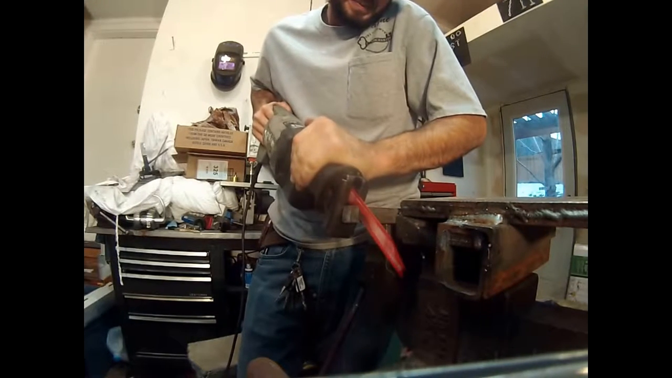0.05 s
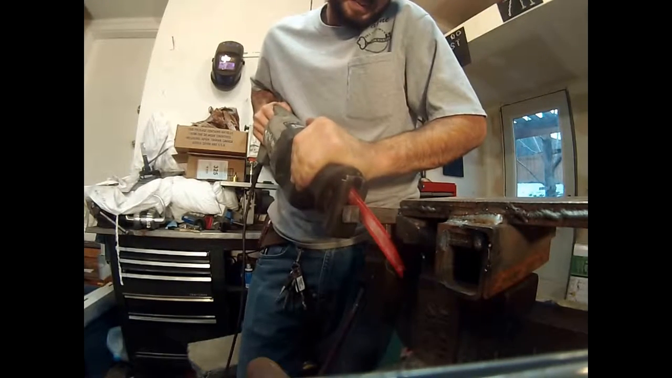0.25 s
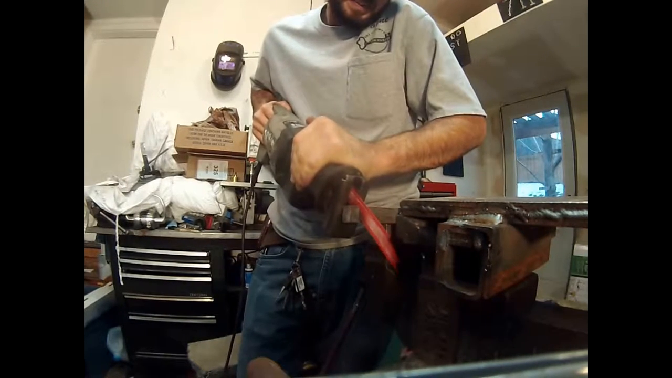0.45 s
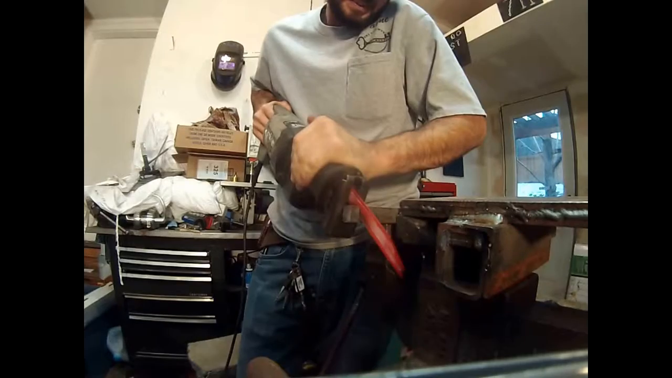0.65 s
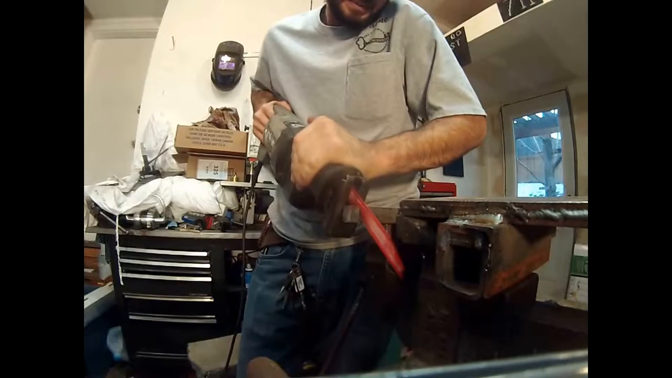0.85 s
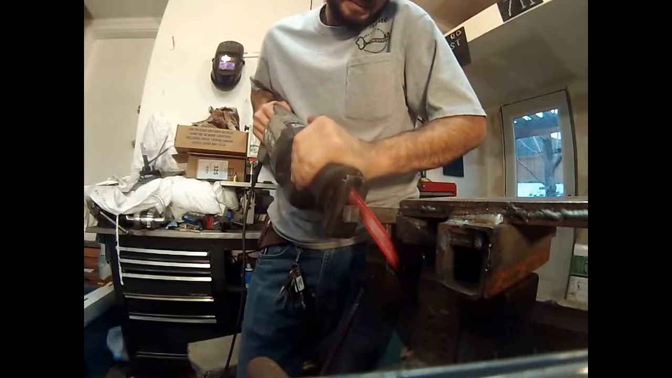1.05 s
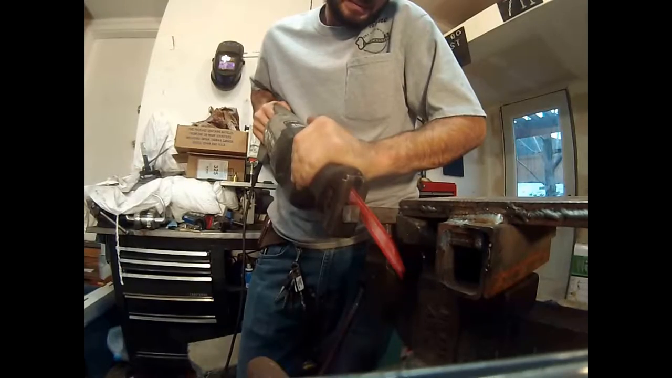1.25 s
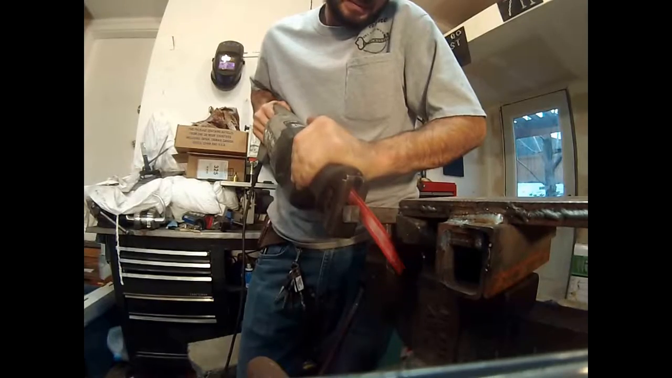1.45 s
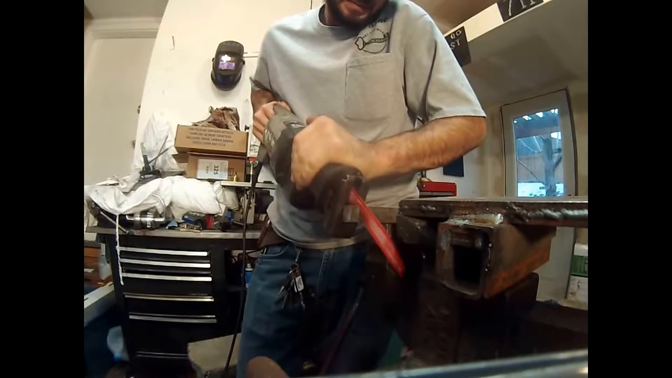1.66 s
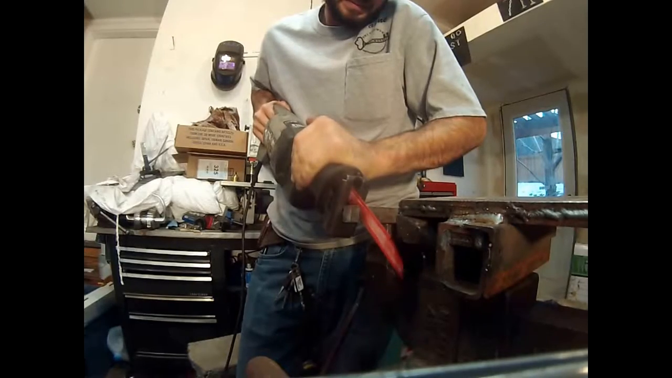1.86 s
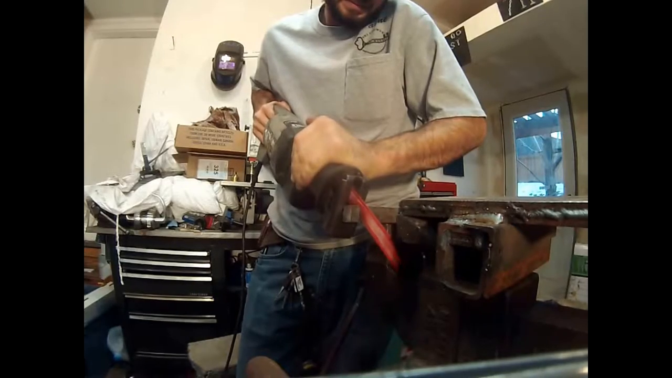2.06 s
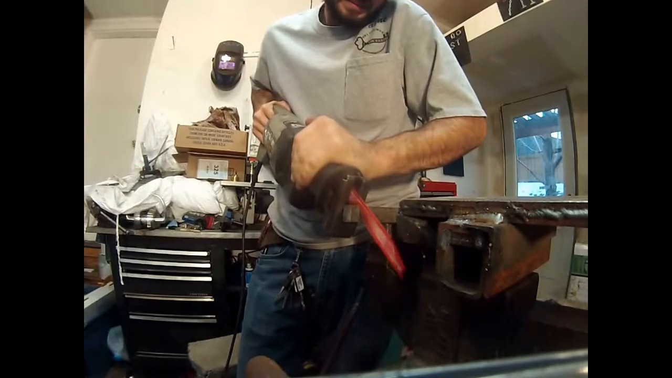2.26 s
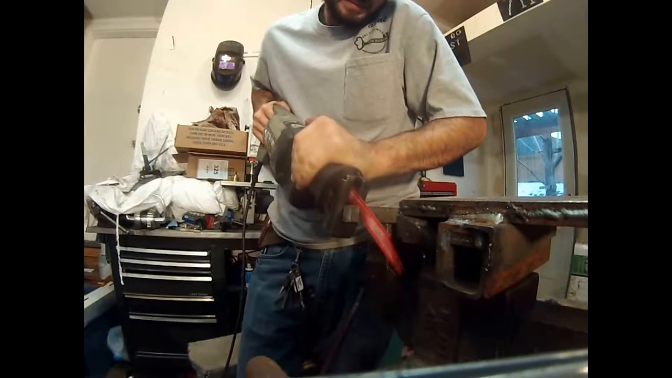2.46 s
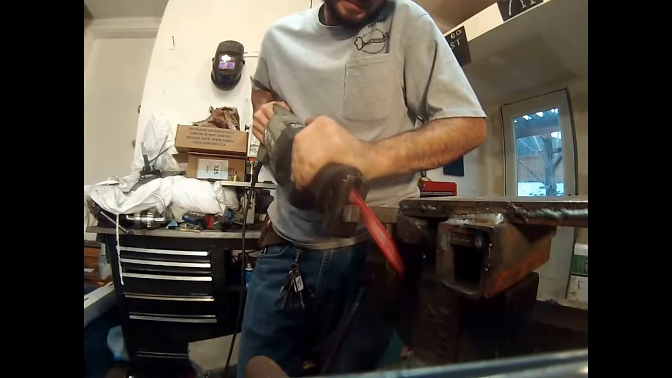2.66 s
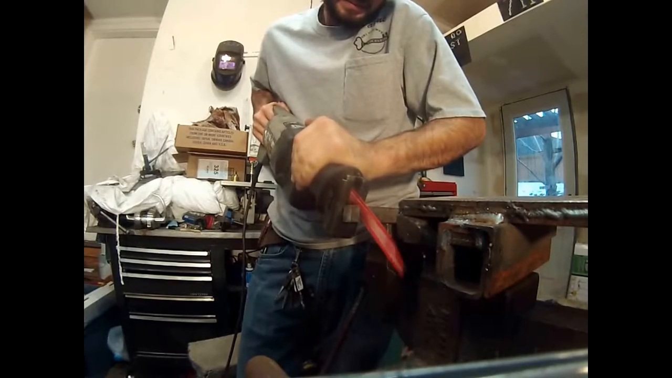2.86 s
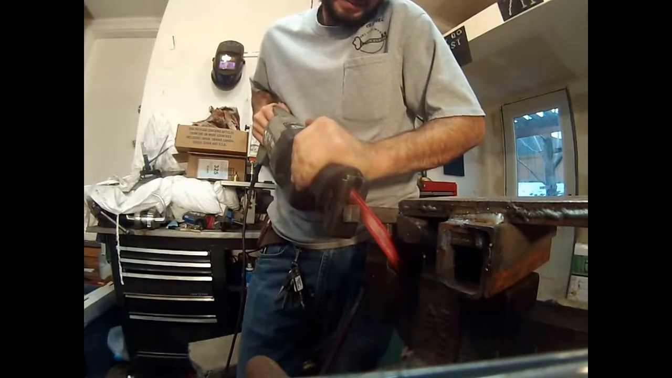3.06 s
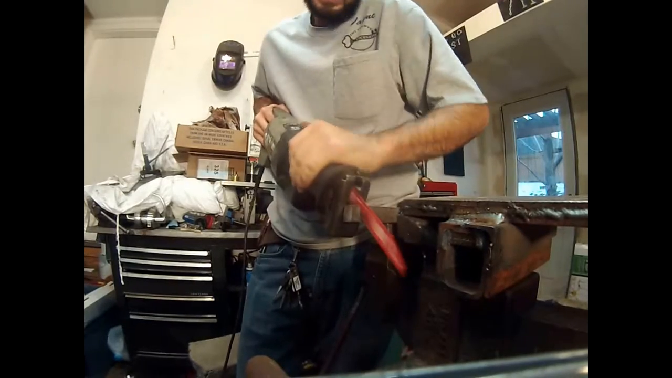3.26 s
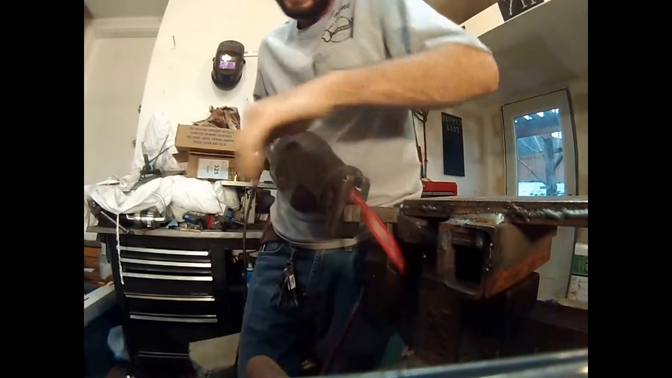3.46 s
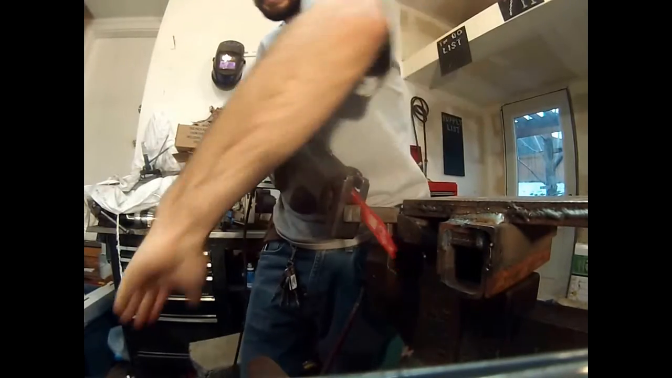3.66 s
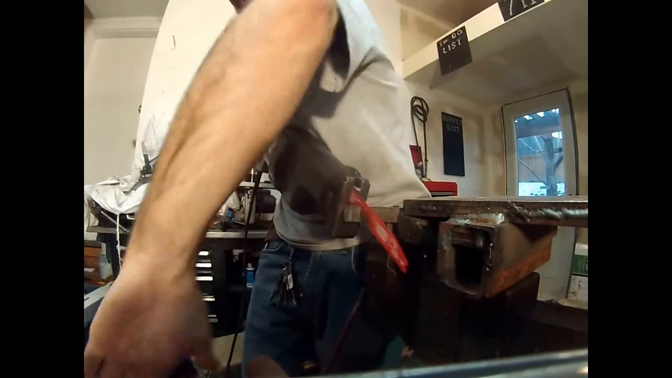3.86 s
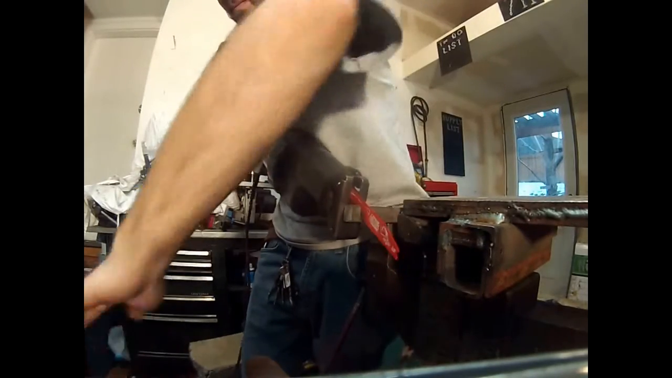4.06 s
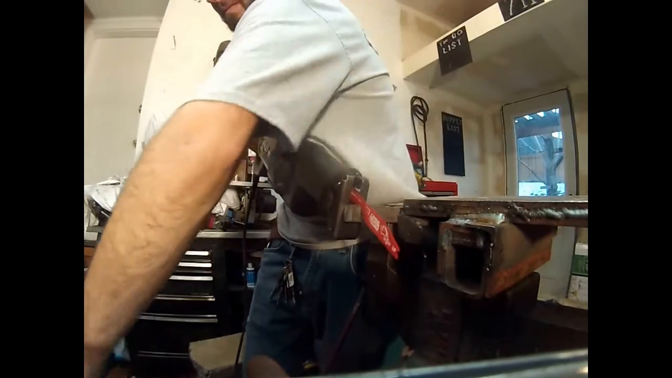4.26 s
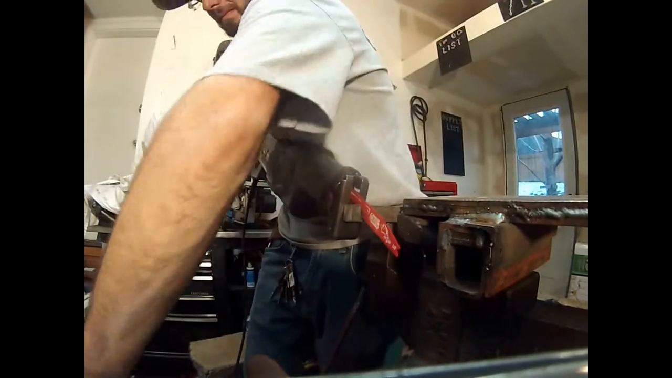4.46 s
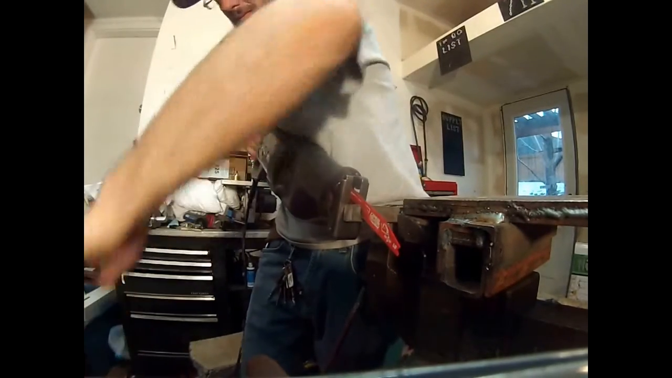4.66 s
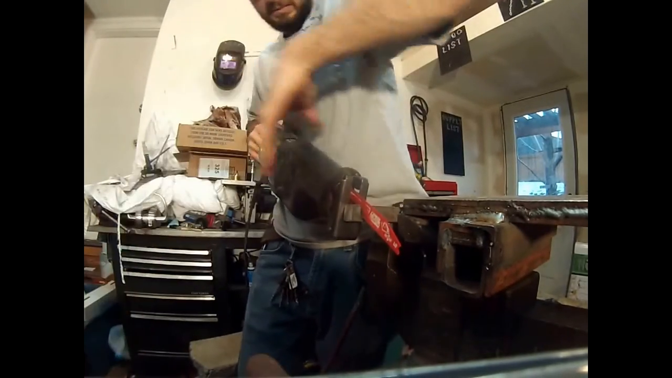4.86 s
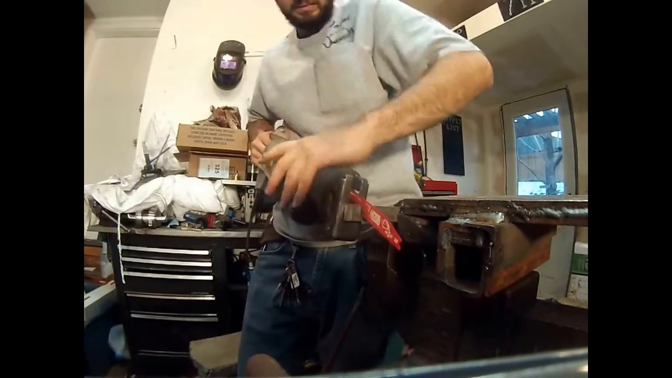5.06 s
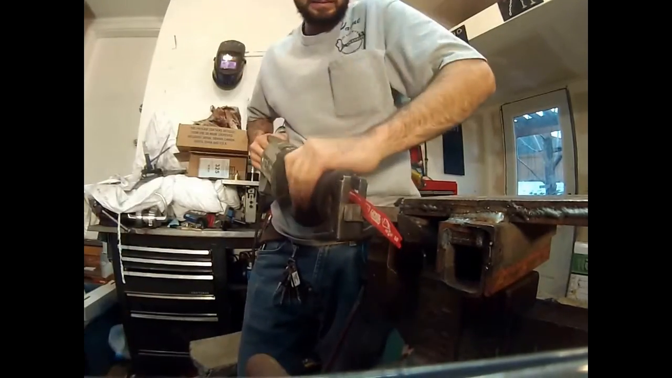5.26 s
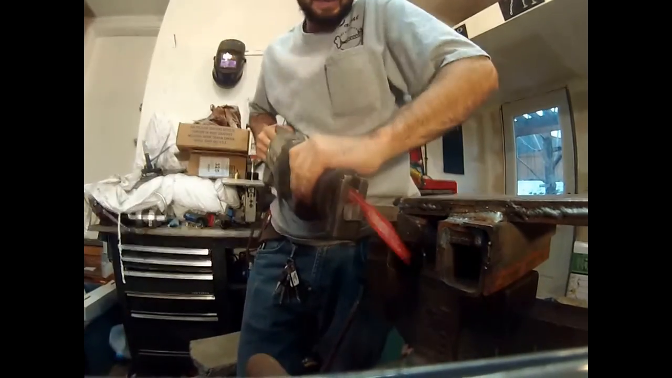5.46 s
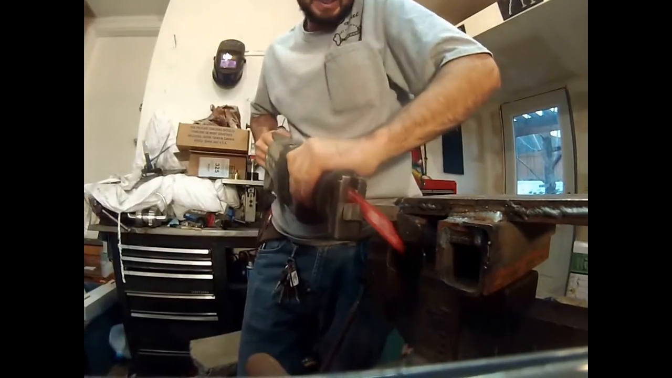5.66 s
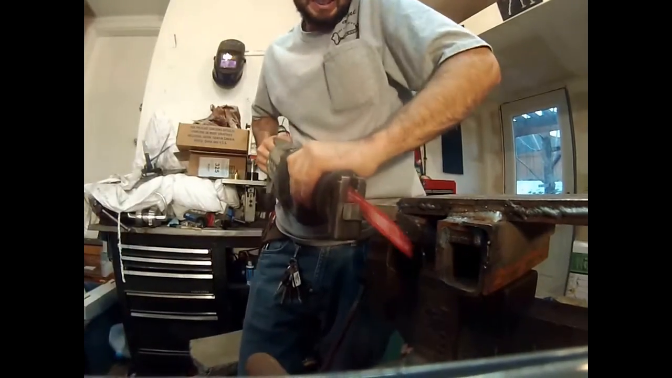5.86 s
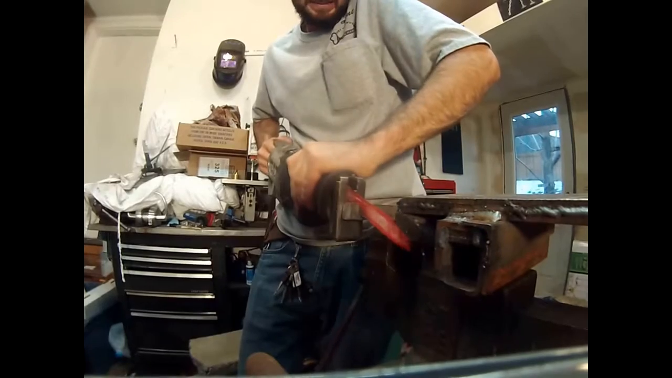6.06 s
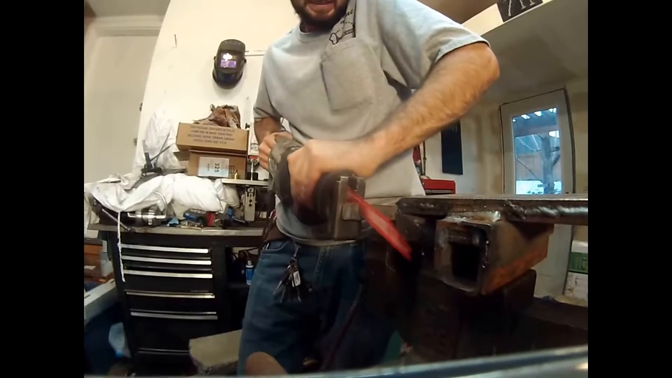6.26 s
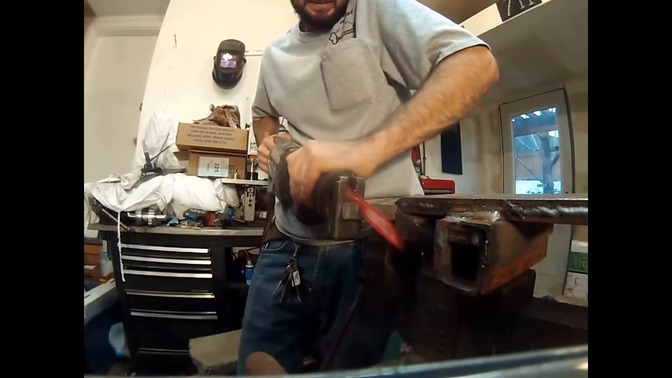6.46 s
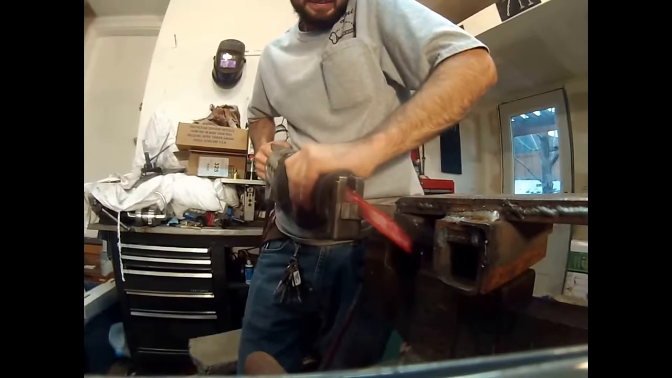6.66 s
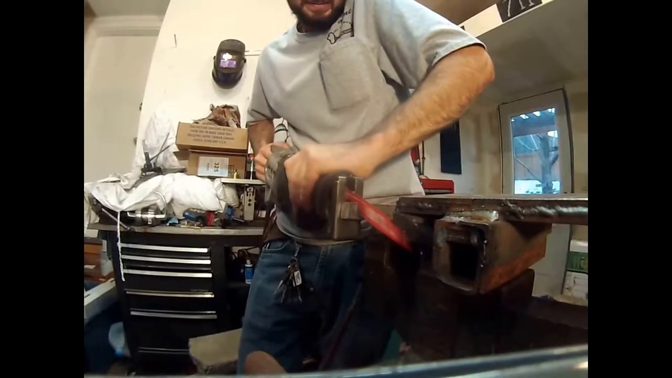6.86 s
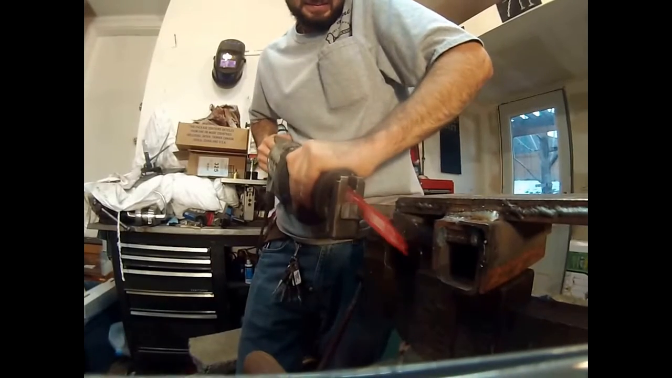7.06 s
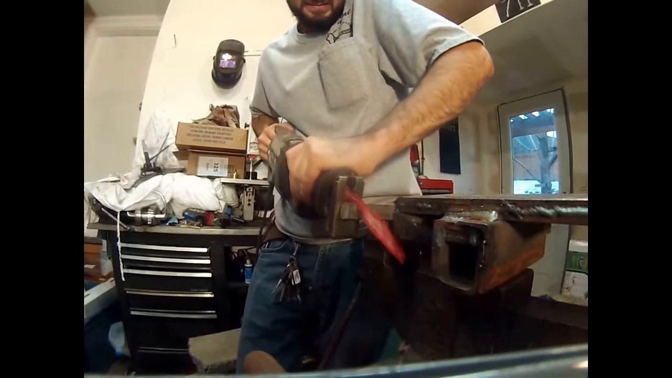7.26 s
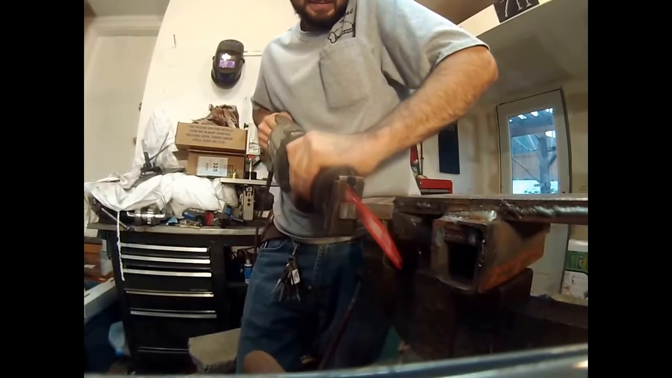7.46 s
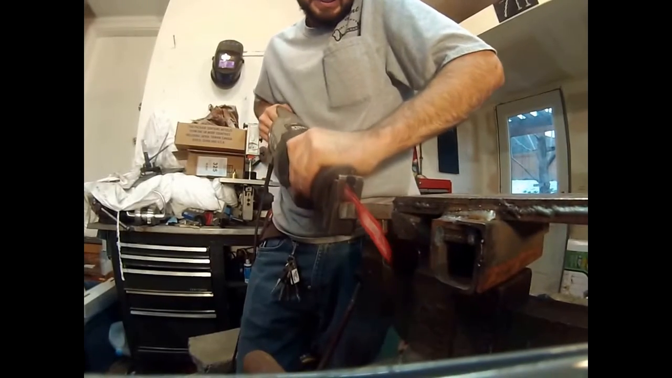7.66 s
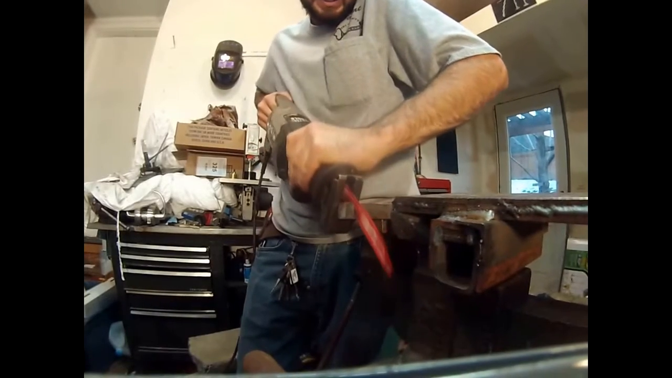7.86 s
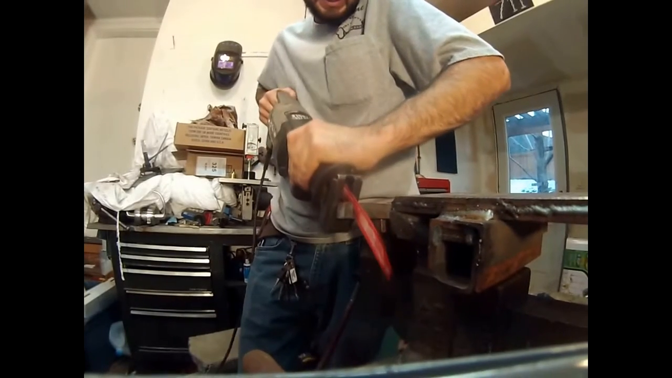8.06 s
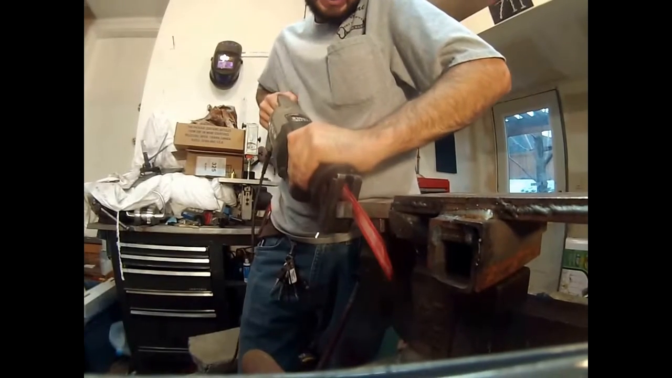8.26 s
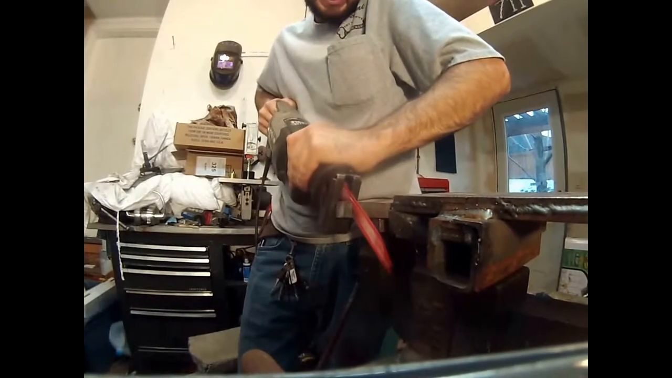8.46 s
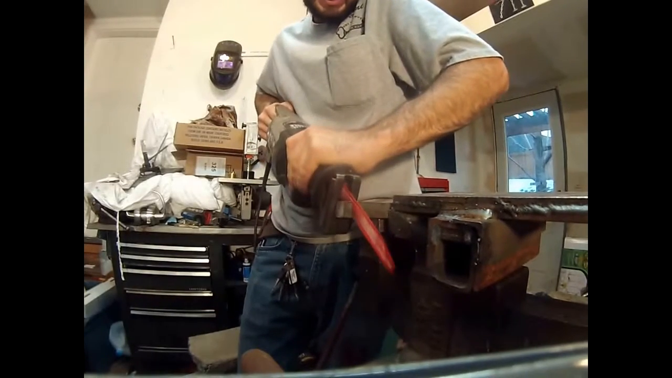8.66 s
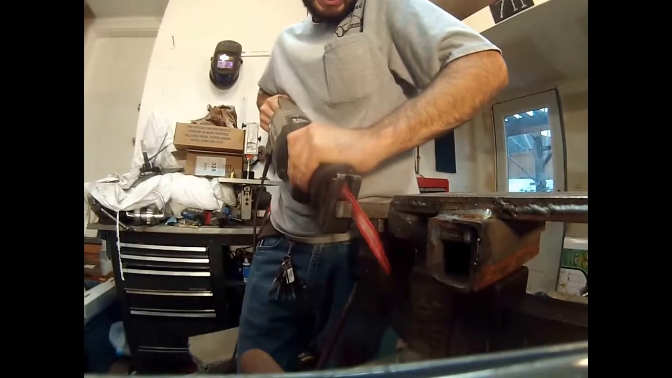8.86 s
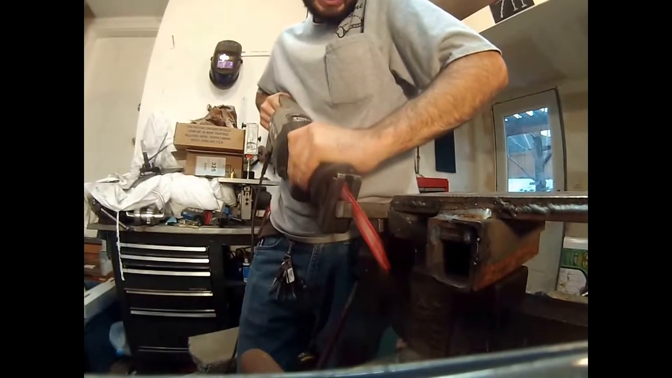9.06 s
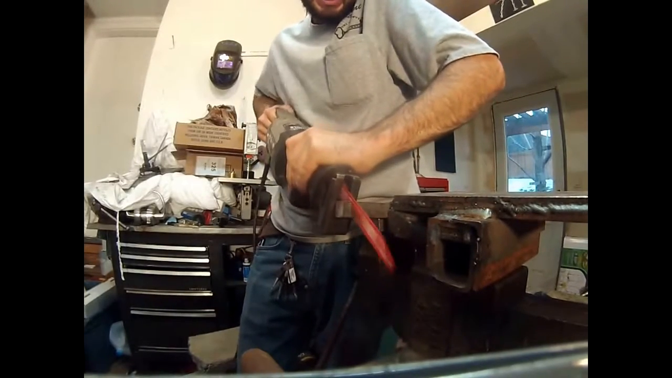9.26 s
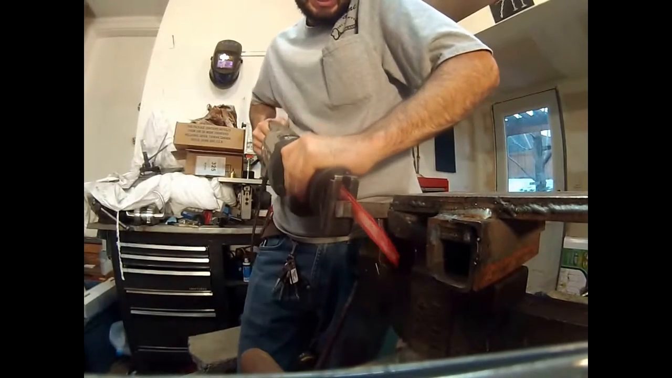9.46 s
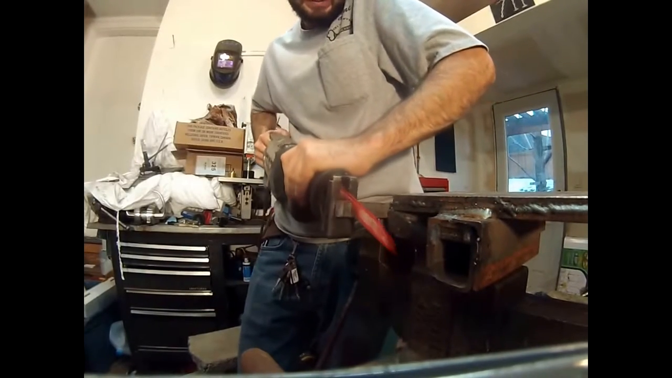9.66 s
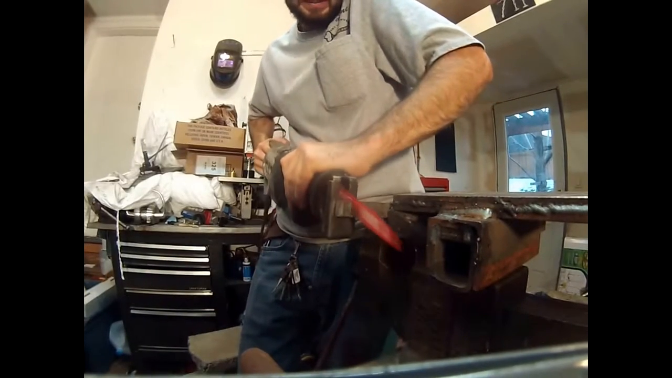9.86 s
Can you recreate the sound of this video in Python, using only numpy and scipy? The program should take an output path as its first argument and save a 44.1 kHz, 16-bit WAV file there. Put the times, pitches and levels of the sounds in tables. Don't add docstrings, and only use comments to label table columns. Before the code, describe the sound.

From 0 to about 3.1 s a corded reciprocating saw cuts a steel tube steadily, close up: some thirty-three clacks a second merge into a harsh buzzing rattle, with gritty tooth rasp, ringing metal, high gear whine and low bench thump. At 3.2 s power is released; the whine falls and the strokes separate into slowing, heavy knocks, halting around 4.0 s. A small scrape and quickly damped clink follow, then a rougher steel drag from 4.35 to 4.8 s with a bright clink ringing at 4.6 s, and faint ticks in near quiet. At 5.34 s the trigger snaps, the motor surges with a few jolting knocks, and cutting resumes. This second cut is more uneven, with hard knocks, hammering chatter and singing metal; it labours and binds around 7.7-8.4 s, recovers speed, and continues to about 9.9 s. Short room reflections surround it.

```python
import sys
import numpy as np
from scipy import signal
from scipy.io import wavfile
from scipy.ndimage import uniform_filter1d, map_coordinates

SR = 44100
rng = np.random.default_rng(int(sys.argv[2]) if len(sys.argv) > 2 else 0)


def persist_wave(psi):
    counts = np.round(np.clip(psi, -1, 1) * 32767).astype(np.int16)
    wavfile.write(sys.argv[1], SR, np.atleast_2d(counts).T)


def elevation(decibels):
    levels = np.asarray(decibels, float)
    return 10 ** (levels / 20)


N = 436590
TIME = np.arange(N) / SR
STOP_S, START_S, BITE_S = 4.04, 5.335, 5.378
FULL_SPEED = 33.3


def evened(x):
    return x / np.sqrt(np.mean(x ** 2) + 1e-20)


def read(points, hz):
    f, value = np.transpose(points)
    return np.interp(np.log(hz + 1), np.log(f + 1), value)


def curves(tables):
    s, *columns = np.transpose(np.concatenate(tables))
    on = sum((TIME >= rows[0][0]) & (TIME <= rows[-1][0]) for rows in tables)
    return [np.interp(TIME, s, c) for c in columns] + [uniform_filter1d(on * 1., size=200)]


def colour(x, points):
    hz = abs(np.fft.fftfreq(8192, 1 / SR))
    gain = np.log(elevation(np.maximum(read(points, hz), -90)))
    taps = np.fft.ifft(np.exp(gain - 1j * signal.hilbert(gain).imag)).real[:4096]
    return signal.oaconvolve(x, taps)[:len(x)]


def ring(x, modes):
    out = np.zeros(len(x))
    for hz, width, db in modes:
        r = np.exp(-np.pi * width / SR)
        poles = [1, -2 * r * np.cos(2 * np.pi * hz / SR), r * r]
        out += elevation(db) * (1 - r * r) / 2 * signal.lfilter([1, 0, -1], poles, x)
    return out


def twice(x, modes):
    out = 0
    for hz, width, db in modes:
        mode = [(hz, width, 0)]
        out = out + elevation(db) * ring(ring(x, mode), mode)
    return out


def drift(rate):
    coarse = np.arange(0, N + 16, 16)
    points = rng.standard_normal(round(N * rate / SR) + 3)
    smooth = map_coordinates(points, [coarse * rate / SR], order=3)
    return np.interp(np.arange(N), coarse, evened(smooth))


def add(mix, s, sound):
    part = mix[round(s * SR):][:len(sound)]
    part += sound[:len(part)]


def typed(events):
    s, db = np.transpose(events)
    clicks = np.zeros(N)
    clicks[(s * SR).astype(int)] = elevation(db)
    return clicks


def bursts(clicks, rise, fall):
    t = np.arange(900) / SR
    shape = 1 / (np.exp((4 * rise - t) / rise) + np.exp((t - 4 * rise) / fall))
    return signal.oaconvolve(clicks, shape)[round(4 * rise * SR):][:N] * rng.standard_normal(N)


def bump(turns, at, depth):
    return np.exp(depth * np.cos(2 * np.pi * (turns - at)))


def spells(rows, edge=0.019):
    out = 0
    for s, length, db in rows:
        inside = np.minimum(TIME - s, s + length - TIME)
        out = out + db * np.clip(inside / edge + .5, 0, 1)
    return out


# start_s, speed_strokes_per_s
SPEED = [
    [(0, 33.661), (.8, 33.55), (1.15, 32.85), (2.3, 33.0), (3.11, 33.3)],
    [(5.335, 12), (5.405, 26), (5.425, 17.8), (5.5, 22.905), (5.7, 31.825), (6.1, 31.849), (6.4, 33.231),
     (6.8, 32.965), (7.4, 32.365), (8.15, 29.71), (8.5, 32.926), (8.9, 33.657), (9.9, 33.488)],
]


def speed():
    off, top = SPEED[0][-1]
    coasting = (TIME > off) & (TIME < SPEED[1][0][0])
    slowing_s = .63
    return np.where(coasting, top * np.exp((off - TIME) / slowing_s), curves(SPEED)[0]), coasting


def by_cut(first_db, second_db, coast_gain):
    rate, coasting = speed()
    return np.where(TIME < START_S, first_db, second_db) - coast_gain * coasting * 20 * np.log10(rate / FULL_SPEED)


# start_s, peak_db
HARD_STROKES = [(5.6104, 1), (5.7074, -4), (5.7404, -1), (6.0252, -4), (6.1728, -13), (6.302, -9),
                (6.5748, -7), (6.788, -11), (6.8456, -3), (6.9736, -8), (7.0625, -2.5), (7.213, -8),
                (7.2744, -3), (7.4306, -4), (7.7432, -3), (7.7742, -13), (7.9034, -8), (8.0027, -4),
                (8.0306, -9), (8.0654, -13), (8.098, -18), (8.1702, -14), (8.199, -10), (8.361, -1),
                (8.4557, -12), (8.641, -8), (8.668, -9), (8.788, -11), (8.85, -13), (8.8825, -6),
                (8.9096, -16), (9.0873, -5), (9.1148, -7), (9.2644, -7), (9.2933, -3), (9.3257, -4),
                (9.684, -5), (9.8612, -6)]
# start_s, end_s, turn_done_share
EVEN_STROKES = [
    (0, 3.19, .93),
    (5.5, 9.9, .278),
]


def strokes():
    times = []
    for s, to, start in EVEN_STROKES:
        part = slice(round(s * SR), round(to * SR))
        turns = start + np.cumsum(speed()[0][part]) / SR
        times.append(TIME[part][1:][np.diff(np.floor(turns)) > 0])
    times = np.concatenate(times)
    hard = np.array(HARD_STROKES)[:, 0] + .001
    times[abs(times[:, None] - hard).argmin(axis=0)] = hard
    return np.sort(times)


# start_s, peak_db
SLOW_STROKES = [(3.206, -7), (3.2455, -9), (3.284, -11), (3.3247, -10), (3.3634, -11), (3.408, -10),
                (3.467, -7), (3.507, -5.5), (3.5706, -9.5), (3.637, -10), (3.654, -14), (3.7142, -8),
                (3.8107, -9.5), (3.874, -24), (3.952, -2.5), (4.028, -17), (5.3442, -7.5), (5.376, -14),
                (5.414, -17), (5.454, -28), (5.4748, -4.5)]
# start_s, rasp_db, shoe_pressure_db
PUSH = [(0, -16.5, -0.5), (.5, -15.5, -0.5), (2.1, -14, -0.5), (2.451, -16, -2), (3.1, -15, 0.5),
        (5.4, -16, 3), (5.6, -18.5, -1.5), (5.85, -15, -5), (6.15, -18.5, 2), (6.4, -20, -7),
        (6.75, -16.5, -2.5), (7.05, -23, -0.5), (7.5, -18, 0), (8.12, -19.5, -1.5), (8.5, -20, 0.5),
        (9.25, -18.5, 2.5), (9.6, -19.5, -5.5), (9.9, -18.5, 0)]
# start_s, length_s, level_db
GRABS = [(6.41, 0.044, 2), (6.49, 0.027, 1), (6.71, .04, 1.5), (6.79, .03, 0.5), (6.86, 0.023, 4.5),
         (7.075, 0.024, 6), (7.165, .03, 4.5), (7.26, 0.015, 0), (7.35, .05, 1.5), (8.11, 0.097, -3.5),
         (8.23, .06, 3), (8.44, 0.037, 0.5), (8.51, .03, 1.5), (9.22, 0.15, 1)]


def effort(every):
    rasp_db, shoe_db, _ = curves([PUSH])
    off = SPEED[0][-1][0]
    last = (np.searchsorted(every, TIME) - 1).clip(0)
    strength = np.interp(every, *np.transpose(sorted(SLOW_STROKES + [(off, -8), (5.5, -8)]))) + 8
    first = TIME < START_S
    held = np.where(first & (TIME > off), PUSH[4][1], rasp_db)
    unload = -4 * (1 - np.exp(-(TIME - off).clip(0) / 0.091))
    coast = unload + by_cut(0, 0, -0.35) + 0.19 * strength[last]
    fade = 139 * (TIME - every[last] - 0.034).clip(0, .2)
    idle = spells([(START_S - 1, BITE_S - START_S + 1, -13)])
    on = uniform_filter1d(1. * ((TIME < STOP_S) | ~first), size=200)
    level = on * elevation(uniform_filter1d(held + np.where(first, coast - fade, idle), size=100))
    return on, level * elevation(spells(GRABS, 0.0051)), shoe_db


def biting(turns):
    grain = elevation(1.01 * drift(60) + 1.08 * drift(400))
    bite = grain * bump(turns, 0.031, 0.081) * bump(2 * turns, .05, 0.11)
    return evened(rng.standard_normal(N) * bite)


# pitch_hz, width_hz, level_db
STEEL = [
    [(1736, 150, -3), (1930, 54, -2), (2290, 10.6, 5), (2546, 140, -8), (3360, 21, -34), (6580, 130, -13.5),
     (7460, 160, -15)],
    [(1780, 47, 4.5), (1930, 190, 2.5), (2280, 35, -2), (2544, 560, -5), (3390, 340, -6.5),
     (3876, 33, -4.5), (6550, 50, -22)],
]


def steel(x):
    return np.concatenate([ring(x[:N // 2], STEEL[0]), ring(x[N // 2:], STEEL[1])])


# pitch_hz, level_db (per Hz)
RASP = [(680, -45.5), (1000, -8.5), (1250, -0.5), (1450, -8), (1960, -1.5), (2160, -5), (2750, -11),
        (4020, -5), (6780, -14), (9290, -40), (11900, -28), (13200, -21.5), (15500, -33)]


def rasp(teeth, level):
    return evened(colour(teeth, RASP) + elevation(-0.5) * steel(teeth)) * level * elevation(-3.0)


def turn_rounds(powered):
    late, strength = rng.standard_normal((2, len(powered)))
    knocks = np.zeros(N)
    knocks[np.clip((powered + .0006 * late) * SR, 0, N - 1).astype(int)] = elevation(1.7 * strength)
    return knocks


def knock_noise(knocks, level):
    rebounds = typed(np.add(SLOW_STROKES, [0.0137, -14.5]))
    slow = elevation(2.0) * (typed(SLOW_STROKES) + rebounds)
    return bursts(knocks * level * elevation(7.5), 0.00037, 0.00097) + bursts(slow, 0.00055, 0.002)


# pitch_hz, level_db (per Hz)
CLACK = [(180, -44), (300, -0.5), (667, -4), (1280, -18), (1870, -13), (3130, 0), (4440, -7), (6620, -2.5),
         (7820, -13), (8360, -26), (14000, -46), (16000, -63)]
# pitch_hz, width_hz, level_db
CLAMP = [(7640, 460, -4.5), (9900, 1600, -20), (12950, 1540, -12.5), (15470, 780, -22)]
# pitch_hz, width_hz, level_db
HOUSING = [(3135, 670, 2.5), (4320, 730, -8.5), (5540, 730, -12.5), (6730, 630, -3), (7430, 650, -12.5)]


def clack(burst, knocks, level):
    body = elevation(3.5) * colour(burst, CLACK) + elevation(-2.0) * steel(burst)
    slow = typed(SLOW_STROKES)
    rattle = bursts(knocks * level + elevation(-9.0) * slow, 0.0013, .0003)
    hard = typed(np.add(HARD_STROKES, [.001, 0]))
    blows = elevation(23.0) * slow + elevation(22.0) * hard + elevation(27.5) * level * knocks
    return body + elevation(13.5) * ring(rattle, CLAMP) + twice(blows, HOUSING)


# pitch_hz, width_hz, level_db
TUBE = [(1028, 40, 0), (1066, 45, -5), (1182, 35, -11)]
# start_s, length_s, level_db
GRIPS = [(6.27, 0.11, -7), (6.57, .04, 6), (6.63, .1, -3), (6.9, 0.1, -10), (7.33, .14, 2.5), (7.6, .25, 2),
         (8.2, .3, 1.5), (9.45, .38, -2.5)]


def tube(teeth, burst, turns, effort_now, chatter, idle):
    on, level, shoe_db = effort_now
    scrub = teeth * bump(turns, 0.47, 0.59) * elevation(0.93 * drift(25))
    drive = evened(scrub + 1.16 * burst / (level + 0.0011) * on)
    db = by_cut(-11.5, -7.5, -0.53) + 0.16 * chatter + 0.13 * shoe_db + spells(GRIPS) - 22 * idle
    return evened(twice(drive, TUBE) * bump(turns, 0.41, 0.28)) * elevation(db - 1.6)


# start_s, peak_db
RECOILS = [(3.217, -21), (3.254, -11.5), (3.293, -15), (3.334, -17), (3.416, -7.5), (3.515, -10.5),
           (3.579, -14), (3.648, -12), (3.724, -16.5), (3.819, -8.5), (3.962, -7.5), (3.978, -16.5),
           (5.434, -4.5), (5.457, -14), (5.481, -8)]
# pitch_hz, width_hz, level_db
VISE = [(783, 11, 1)]


def vise(teeth, level):
    drive = teeth * level * elevation(by_cut(-19, -18, .5))
    return elevation(30) * ring(drive + elevation(2) * typed(RECOILS[5:-3]), VISE)


# pitch_hz, width_hz, level_db
SQUEAL = [(6630, 70, 0), (8130, 80, -11), (9750, 60, -15), (10600, 70, -20), (12800, 140, -13),
          (13400, 100, -16), (15000, 200, -24)]


def squeal(teeth):
    singing_db = spells([(4, 4.35, 13.2)])
    out = 0
    for mode in SQUEAL:
        stick = teeth / (1 + np.exp(-5.0 * (drift(28) - .1)))
        out = out + twice(stick, [mode]) * elevation((singing_db - 9.0) * (mode == SQUEAL[0]))
    return evened(out) * elevation(-20)


# speed_multiple, level_db
ORDERS = [(1, -15), (2, -4), (3, 0), (4, -4), (5, -6), (6, 2.5), (7, -14), (8, -14), (9, -17), (10, -8),
          (14, -12)]
# start_s, length_s, level_db, speed_multiple
LEANS = [(7.8, .45, 8, 6), (7.85, .35, 8, 5), (8.9, .45, 6, 10), (7.9, .35, -12, 2), (7.9, .35, -12, 3),
         (8.35, 1.05, 7, 5), (7.2, .7, 5, 5), (6.9, .3, -5, 6), (9.4, .2, -8, 3), (6.55, .2, 4, 3)]


def bench_orders(turns):
    pace = np.gradient(turns)
    sway_db = 35 * np.log10(uniform_filter1d(pace, size=900) * SR / 33 + .01)
    heavy = np.cumsum(uniform_filter1d(pace, size=SR // 7))
    waver = by_cut(.8, 1.5, 0)
    dull = by_cut(0, -4, 0)
    out = 0
    for k, db in ORDERS:
        lean_db = spells([row[:3] for row in LEANS if row[3] == k], .05)
        level_db = db + sway_db + lean_db + waver * drift(7) + dull * np.log2(max(k / 3, 1))
        phase = 2 * np.pi * round(k) * heavy + 0.087 * drift(12.0) + 0.64 * k
        out = out + elevation(level_db) * np.cos(phase)
    return out


# pitch_hz, level_db (per Hz)
RUMBLE = [(15, -45), (50, -22), (100, -2), (200, -4), (280, -12), (500, -45)]
# pitch_hz, level_db (per Hz)
SHAKE = [(140, -42), (230, -5), (340, -6), (475, -0.5), (577, -6.5), (776, -2.5), (910, -8.5), (1100, -7),
         (1560, -54), (2640, -108)]


def bench(turns, shoe_db, chatter, idle):
    thump = rng.standard_normal(N) * bump(turns, 0.34, 0.35) * bump(4 * turns, 0.06, 0.17)
    thump = thump * elevation(0.62 * drift(30))
    rumble_db = by_cut(-13.5, -11, 0.78) + shoe_db + 12 * idle
    rumble = evened(2.07 * evened(bench_orders(turns)) + evened(colour(thump, RUMBLE)))
    shake_db = by_cut(-17, -16, 0.2) + chatter / 2
    shake = evened(colour(thump * bump(turns, 0.6, .08 * chatter), SHAKE))
    return rumble * elevation(rumble_db - 1.0) + shake * elevation(shake_db + 1.5)


# start_s, length_s, mesh_db, slot_tone_db
EASES = [(2.35, 2, 1.5, -9), (3.17, .12, 1.5, 0), (3.3, .3, -2.5, 0), (6.86, .49, 3, 0), (7.4, 1, -5, 0),
         (8.45, 2, 5, 10), (9.75, 1, -6, 0)]


def whine(turns, level):
    rate, coasting = speed()
    freed, hummed = (spells(np.array(EASES)[:, [0, 1, k]]) for k in (2, 3))
    surge = (TIME > START_S) * np.exp(-((TIME - START_S) / 0.4) ** 4)
    sag = -0.5 * ~coasting * (1 - surge) * (rate - FULL_SPEED)
    db = by_cut(-23.5, -30.5, -2.5) + freed + sag + 8.5 * surge
    on = uniform_filter1d(1. * ((TIME < STOP_S) | ~coasting), size=400)
    angle = 2 * np.pi * np.cumsum(60. * rate) / SR
    swing = 0.3 * np.sin(2 * np.pi * turns) + 0.2 * drift(30)
    load = evened(bump(turns, 0.063, 0.31) * bump(2 * turns, 0.3, 0.7) * elevation(0.89 * drift(60)))
    load = load * bump(turns, .42, .7 * coasting)
    slots = level * elevation(by_cut(-11.5, -24, -1.5) + hummed + 1.5 * drift(30))
    slots = slots * np.cos(1.714 * angle + .3 * drift(25))
    mesh = np.cos(angle + swing) + elevation(-17.5 + freed) * np.cos(2 * angle + swing)
    return on * (elevation(db + 2.5 + spells([(START_S, .042, -25)])) * load * mesh + slots)


# pitch_hz, t60_s
ROOM = [(100, 0.71), (500, 0.59), (2000, 0.51), (6000, 0.15), (15000, 0.29)]


def room(x):
    size = SR // 2
    taps = np.zeros(size)
    at = np.arange(200, size - 20, 20)
    taps[at + rng.integers(0, 20, len(at))] = rng.choice([-1., 1.], len(at))
    hz, t, z = signal.stft(taps, SR, nperseg=256)
    tail = signal.istft(z * elevation(-60 * t / read(ROOM, hz)[:, None]), SR, nperseg=256)[1]
    return signal.oaconvolve(x, tail / np.linalg.norm(tail))[:N]


# pitch_hz, level_db (per Hz)
FLOOR = [(12, -34), (20, -4), (148, 0), (1770, -20), (3850, -21), (5380, -26), (6020, -15), (6540, -30),
         (15500, -41)]


def quiet_floor():
    return elevation(-55) * evened(colour(rng.standard_normal(N), FLOOR))


# pitch_hz, width_hz, level_db
RECOIL = [(65.6, 70, 4), (130, 180, -1.5), (480, 230, -16), (1093, 99, 7), (1410, 340, -20),
          (2300, 400, -5)]


def recoil():
    return elevation(10.0) * ring(bursts(typed(RECOILS), 0.0016, 0.0029), RECOIL)


# start_s, level_db, treble_db (against the level)
SCRAPES = [
    [(4.03, -41, -12), (4.09, -48, 17), (4.16, -54, -24)],
    [(4.342, -50, -23), (4.375, -30, -3), (4.42, -34.5, 2), (4.436, -27, -1), (4.46, -31, 5.5),
     (4.576, -36, -6), (4.602, -31, 0), (4.82, -59, -21)],
]
# pitch_hz, level_db (per Hz)
DRAG = [(35, -62), (60, -34), (98, 0), (140, -1), (222, -9.5), (427, 0.5), (503, 1), (593, -1),
        (2190, -4.5), (2470, -8), (6000, -7), (12100, -20), (16000, -29)]


def scrape():
    drag_db, treble_db, on = curves(SCRAPES)
    grit = evened(colour(rng.standard_normal(N) * elevation(2.6 * drift(300) + 3.6 * drift(50)), DRAG))
    low = signal.sosfilt(signal.butter(2, 6000, fs=SR, output="sos"), grit)
    return on * elevation(drag_db) * (evened(low) + elevation(treble_db - 2.0) * evened(grit - low))


# start_s, peak_db, damped_after_s
CLINKS = [
    (4.045, -15.5, 0.06),
    (4.592, -18, .9),
]
# pitch_hz, level_db, t60_s
PARTS = [
    [(3640, -22, .2), (4242, -16, .2), (5163, -18, .15), (5911, 0.2, .7), (6800, -16, .2), (7845, -16, .3),
     (8590, -9, .2), (10600, -20, .2), (11750, -17, .2), (12135, -12, .15), (12850, -17, .2),
     (13645, -10, .25), (14505, -18, .15)],
    [(4759, -9, .2), (5060, -13, .5), (5350, -16, .3), (5674, -7, .35), (5932, -3, .96), (6228, -11, .24),
     (7278, -2, .48), (7784, -18, .35), (8457, -8, .16), (9410, -14, .23), (10310, -8, .27),
     (10800, -18, .19), (11180, -13, .21), (11760, -4, .2), (12400, -16, .15), (13330, -6, .14),
     (13880, -12, .36), (14220, -15, .12)],
]
# start_s, peak_db, pitch_hz
TICKS = [(4.045, -9, 5460), (4.5822, -14, 5870), (4.094, -20, 4230), (4.1214, -32, 3890),
         (4.379, -27, 1380), (4.409, -29, 1530), (4.4264, -27, 2210), (4.4335, -14, 2220),
         (4.4595, -21, 1120), (4.5144, -28, 3120), (4.5307, -20, 4960), (4.581, -18, 1230),
         (4.937, -37.5, 1740), (4.945, -34, 1350), (4.9834, -41, 1470), (5.258, -48, 3730),
         (5.266, -41, 3850), (5.299, -38, 4020), (5.327, -25, 3020)]
# start_s, end_s, pitch_hz, level_db
CHIRPS = [
    (4.09, 4.345, 3890, -55),
    (4.81, 4.91, 3870, -61),
    (5.12, 5.155, 3860, -58),
]


def handling():
    out = scrape()
    t = np.arange(SR) / SR
    for (s, db, held), modes in zip(CLINKS, PARTS):
        tones = sum(elevation(d - 60 * t / t60) * np.sin(2 * np.pi * hz * t) for hz, d, t60 in modes)
        damp = elevation(-900 * (t - held).clip(0, .025))
        contact = rng.standard_normal(SR) * np.exp(-t / 0.0013)
        add(out, s, elevation(db) * (0.36 * tones * damp + 0.28 * contact))
    for s, db, hz in TICKS:
        snap = rng.standard_normal(600) * np.exp(-t[:600] / 0.0046)
        add(out, s, elevation(db) * (0.33 * uniform_filter1d(snap, size=6) + 1.47 * ring(snap, [(hz, 900, 0.3)])))
    for s, to, hz, db in CHIRPS:
        t = np.arange(0, to - s, 1 / SR)
        add(out, s, elevation(db) * np.sin(2 * np.pi * hz * t) * signal.windows.tukey(len(t), .4))
    return out


# start_s, peak_db
TRIGGER = [
    (5.3428, 0),
]
# pitch_hz, width_hz, level_db
TRIGGER_RING = [(3040, 260, 22), (6660, 360, 13)]


def trigger():
    return ring(typed(TRIGGER), TRIGGER_RING)


# start_s, length_s, pitch_hz, width_hz, level_db
SONGS = [(5.439, .018, 1040, 90, -3), (5.482, 0.034, 1110, 110, -8), (5.7, 1.95, 1727, 28, -13),
         (7.852, 0.28, 1062, 90, -4.5), (5.372, 0.047, 5600, 350, -9.5), (5.58, 0.33, 1736, 130, -11.5),
         (6.0, 0.76, 1890, 90, -10.5), (6.65, 0.3, 1700, 130, -17), (6.65, 0.31, 1870, 90, -11),
         (8.198, 0.12, 1654, 150, -6), (8.81, .5, 4010, 219, -18), (9.384, 0.073, 1930, 70.4, -1),
         (9.484, 0.085, 1720, 110, -10), (9.5, .15, 1885, 80, -8)]


def songs(teeth):
    out = np.zeros(N)
    for s, length, hz, width, db in SONGS:
        part = teeth[round((s - .005) * SR):][:round((length + .02) * SR)]
        sung = evened(twice(part, [(hz, width, 0)]))
        add(out, s - .005, elevation(db) * sung * signal.windows.tukey(len(part), .2))
    return out


# start_s, length_s, level_db
CHATTER = [(5.98, 0.2, 7), (6.26, 0.032, 9), (6.6, 0.38, 6), (7.28, 0.45, 8), (7.85, 0.35, 8.5),
           (9.12, 0.24, 4.5), (9.72, 0.22, 6)]
# pitch_hz, width_hz, level_db
HAMMER = [(480, 160, 34), (330, 130, 29)]


def hammer(knocks, level, chatter):
    return ring(np.roll(knocks, round(.017 * SR)) * level * (elevation(chatter) - 1), HAMMER)


# start_s, peak_db
BINDS = [(7.742, -8), (7.904, -1.5), (7.937, -2.5), (8.002, -2), (8.035, -8), (8.066, -2), (8.1, -2),
         (8.136, -25), (8.17, -4.5), (8.201, -17), (8.238, -21), (8.267, -9), (8.359, -7)]
# pitch_hz, width_hz, level_db
JERK = [(450, 47, -8), (1174, 100, 3), (2160, 60, 3), (2330, 110, 5.5), (2850, 120, -5), (4200, 400, -29)]


def jerk():
    return elevation(1.5) * elevation(9) * ring(bursts(typed(BINDS), 0.0024, 0.0035), JERK)


def saw():
    powered = strokes()
    every = np.sort(np.concatenate([powered, np.array(SLOW_STROKES)[:, 0]]))
    stroke_times = np.r_[every[0] - .03, every, every[-1] + .03]
    turns = np.interp(TIME, stroke_times, np.arange(len(every) + 2))
    effort_now = effort(every)
    _, level, shoe_db = effort_now
    chatter = spells(CHATTER)
    idle = spells([(START_S - .1, BITE_S - START_S + .1, 1)])
    teeth = biting(turns)
    knocks = turn_rounds(powered)
    burst = knock_noise(knocks, level)
    body = tube(teeth, burst, turns, effort_now, chatter, idle) + squeal(teeth)
    body = body + bench(turns, shoe_db, chatter, idle) + songs(teeth)
    out = rasp(teeth, level) + clack(burst, knocks, level) + vise(teeth, level)
    out = out + level * body + whine(turns, level)
    return out + recoil() + trigger() + hammer(knocks, level, chatter) + jerk()


def scene():
    near = saw() + handling()
    return (near + elevation(-11.5) * room(near) + quiet_floor())[None]


def low_pass(x):
    return signal.sosfilt(signal.butter(12, 16520, fs=SR, output="sos"), x)


def record(dry):
    edge = signal.firwin(255, 15450, fs=SR)[None]
    mix = signal.oaconvolve(1.006 * np.tanh(dry / 0.93), edge, "same")
    return low_pass(mix)


dry = scene()
out = record(dry)
persist_wave(out)
```